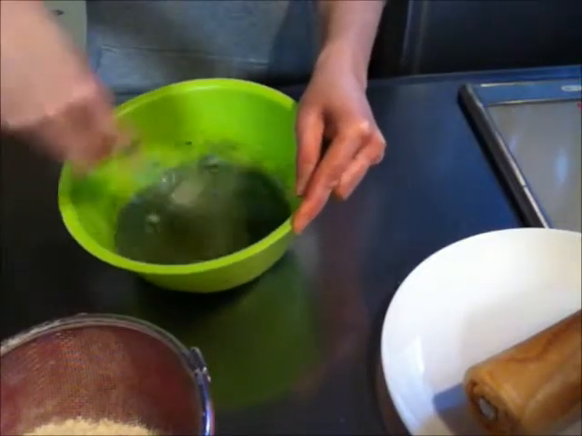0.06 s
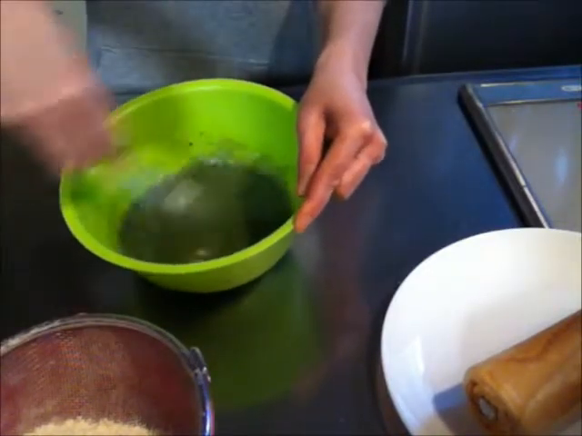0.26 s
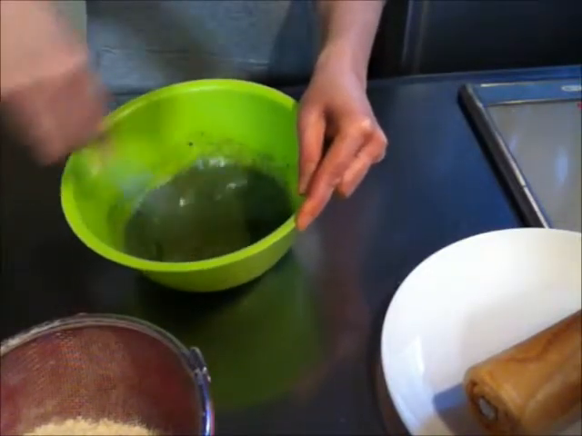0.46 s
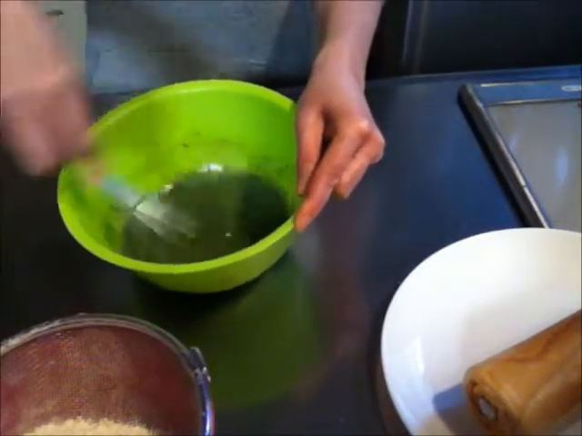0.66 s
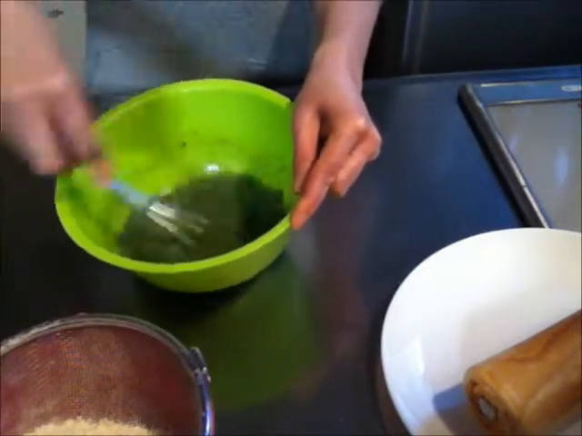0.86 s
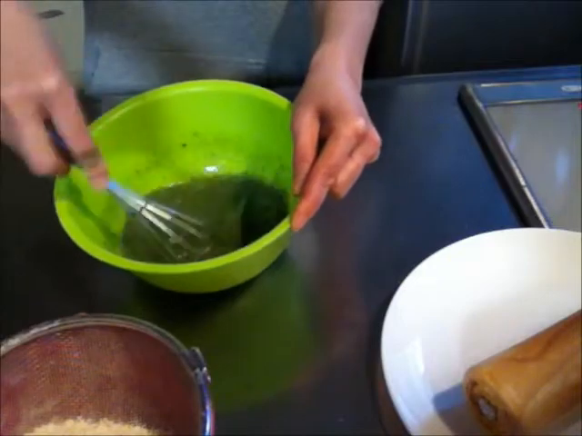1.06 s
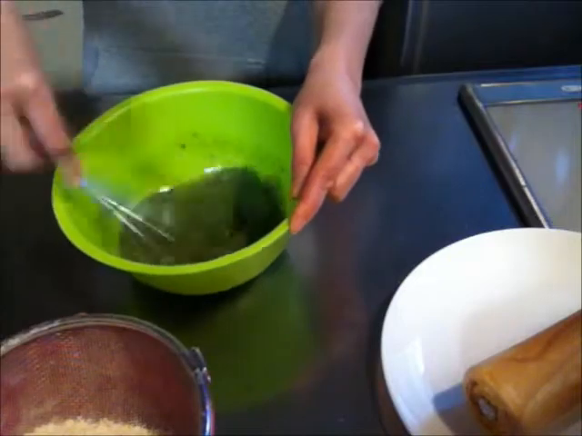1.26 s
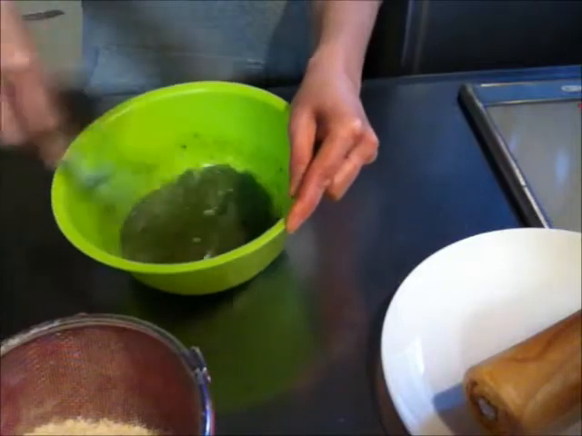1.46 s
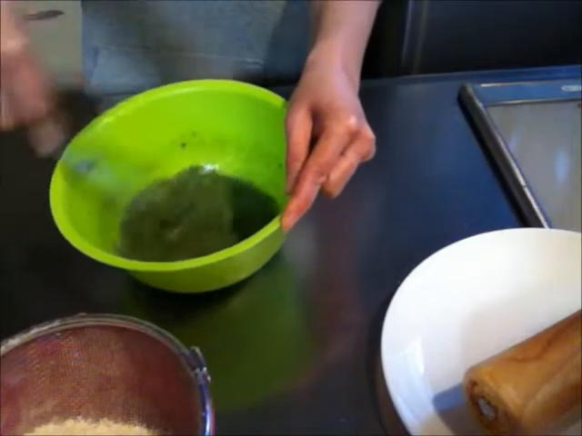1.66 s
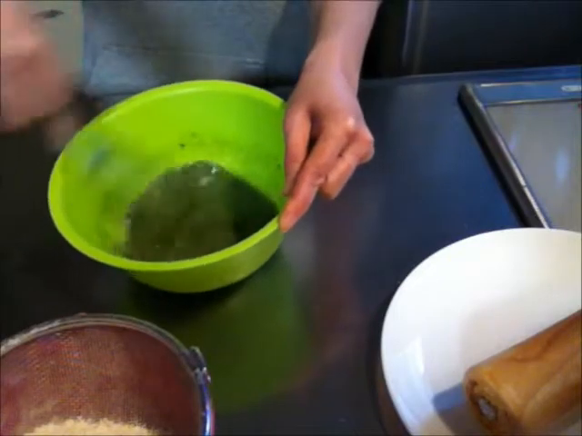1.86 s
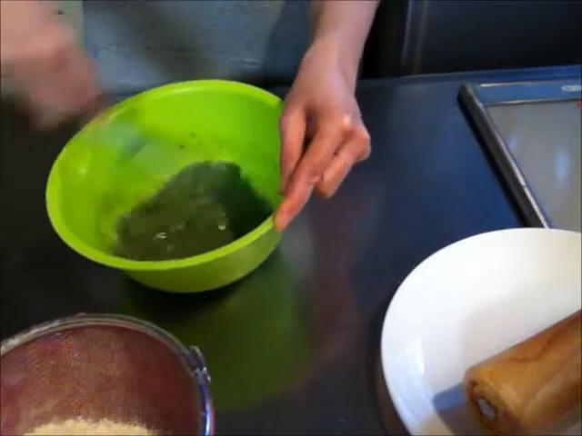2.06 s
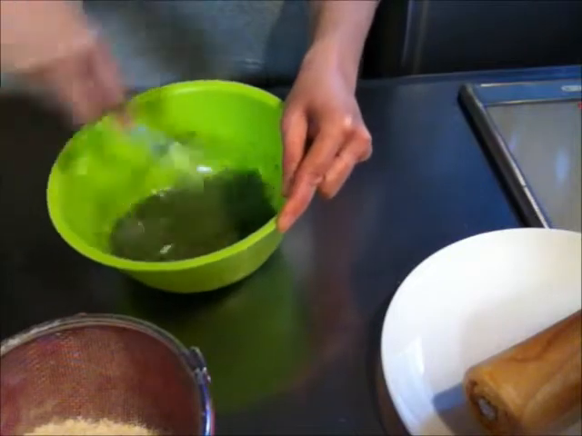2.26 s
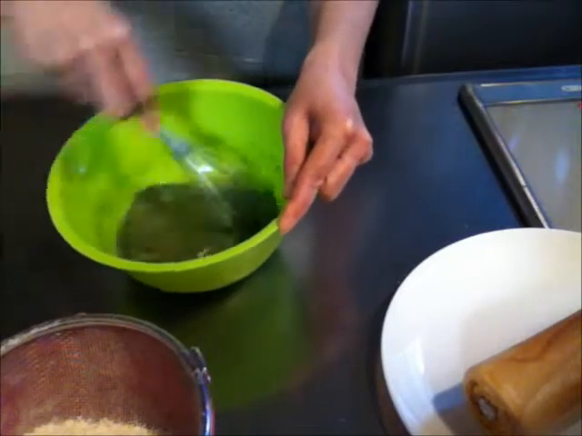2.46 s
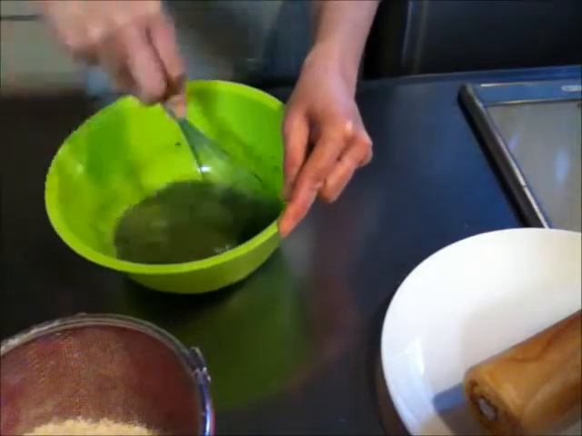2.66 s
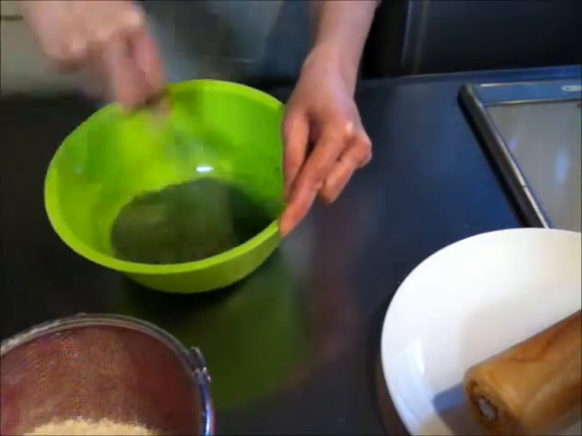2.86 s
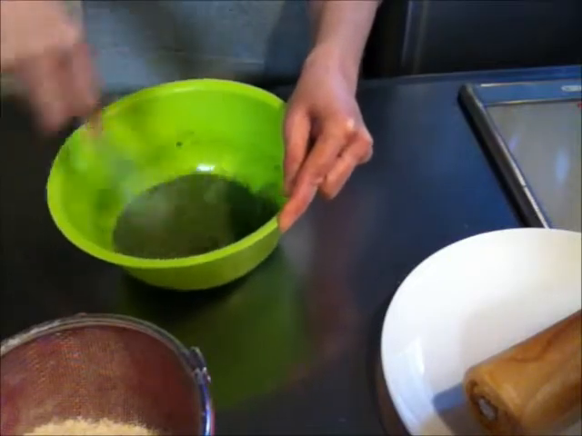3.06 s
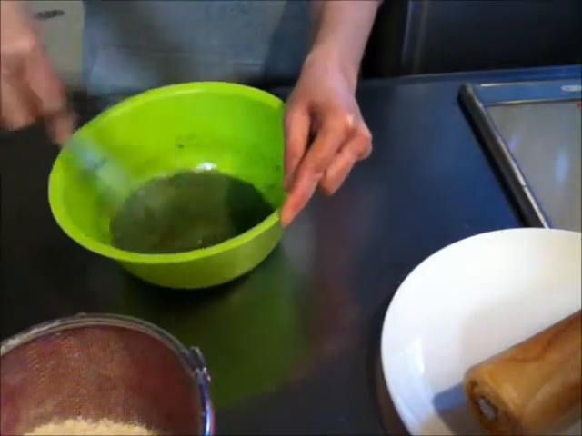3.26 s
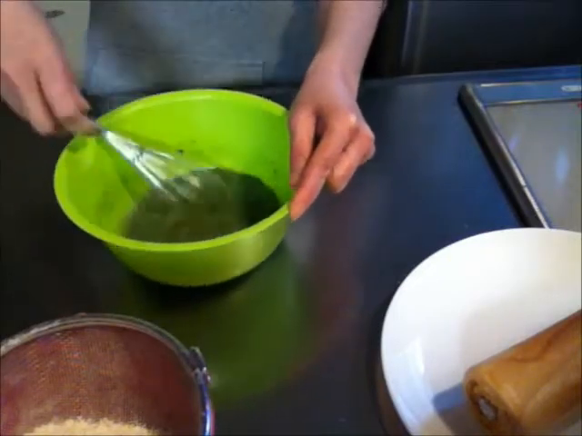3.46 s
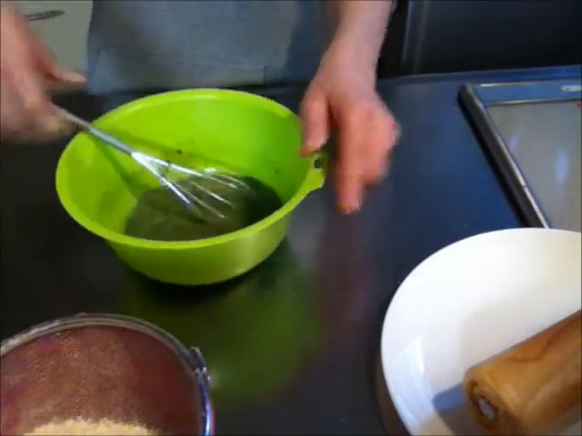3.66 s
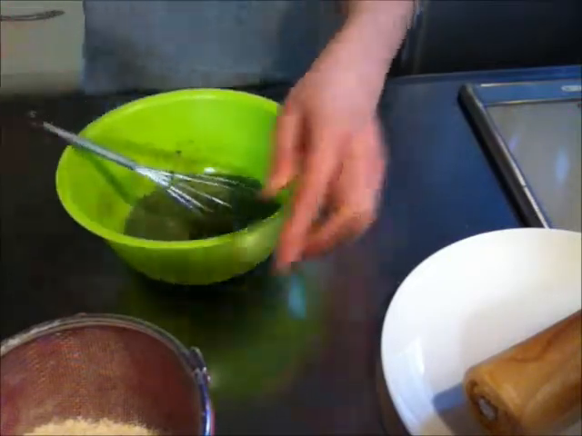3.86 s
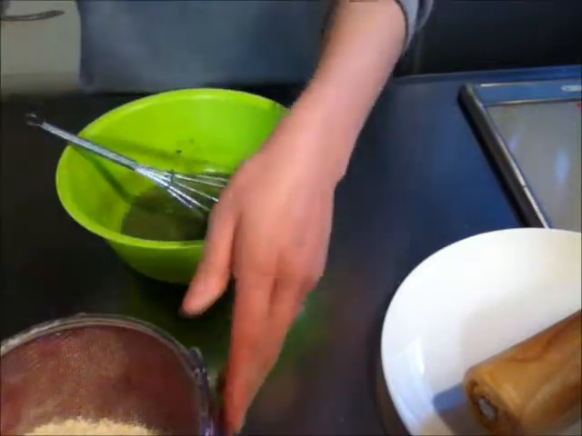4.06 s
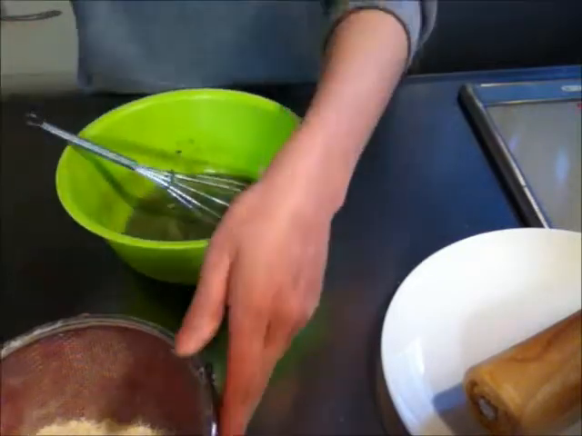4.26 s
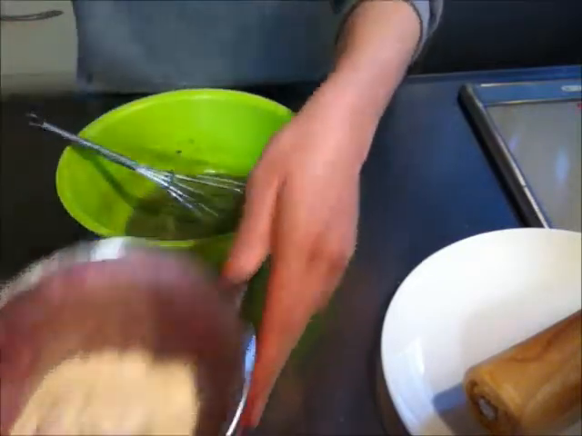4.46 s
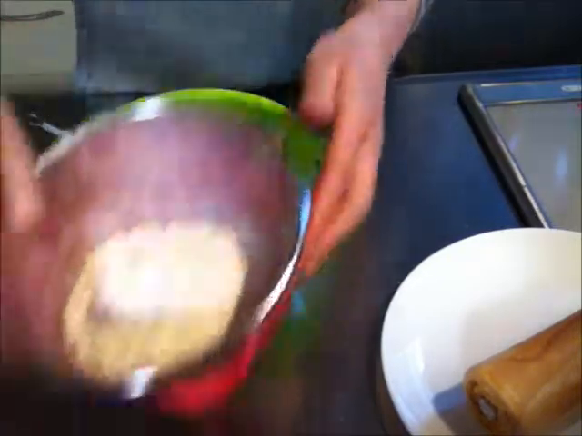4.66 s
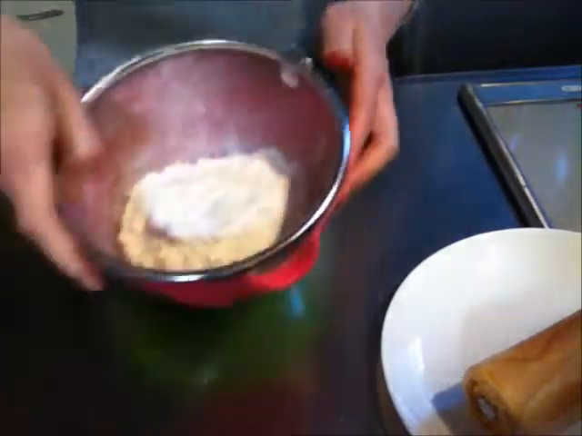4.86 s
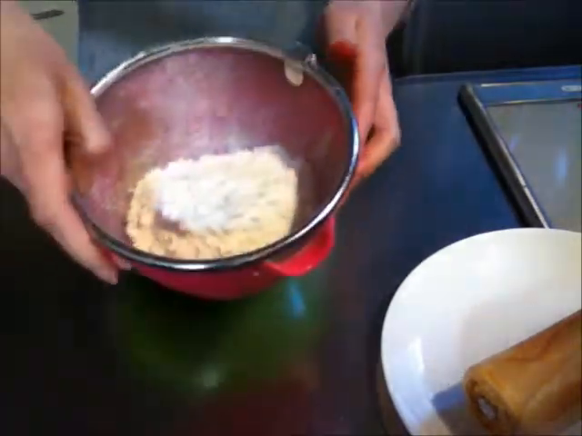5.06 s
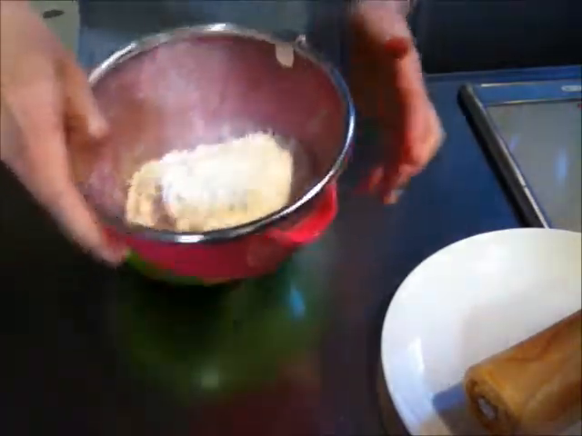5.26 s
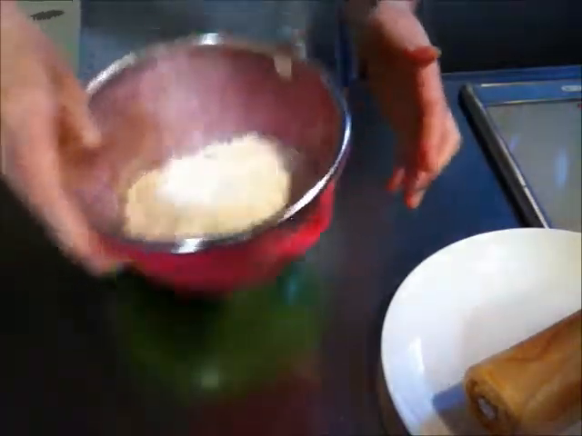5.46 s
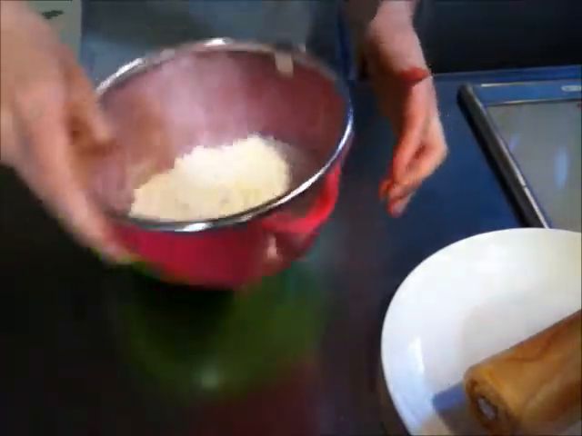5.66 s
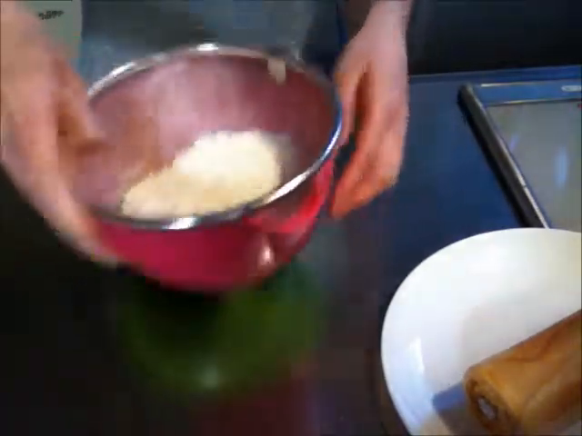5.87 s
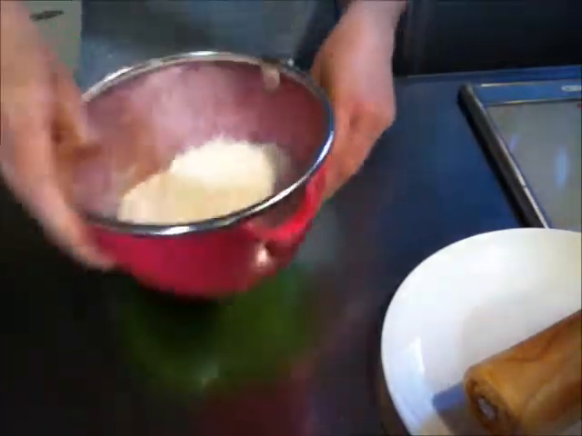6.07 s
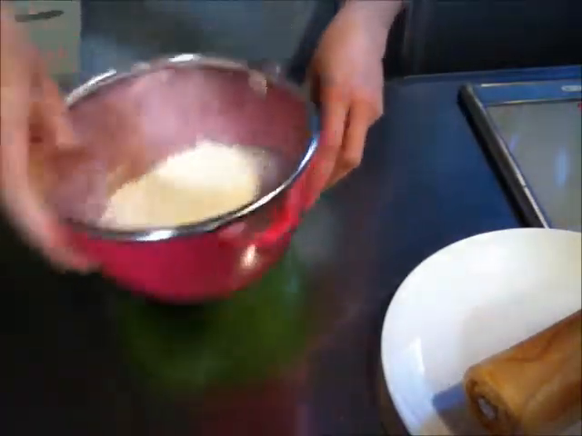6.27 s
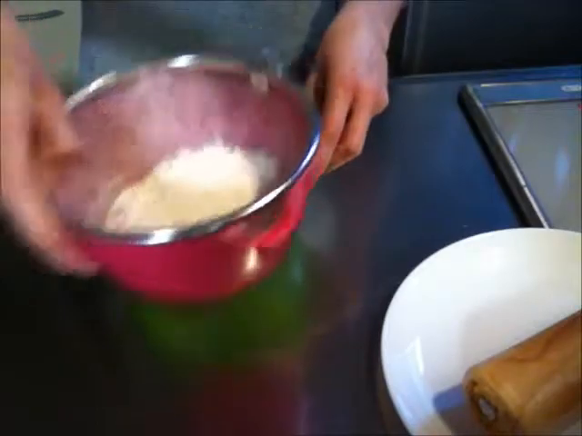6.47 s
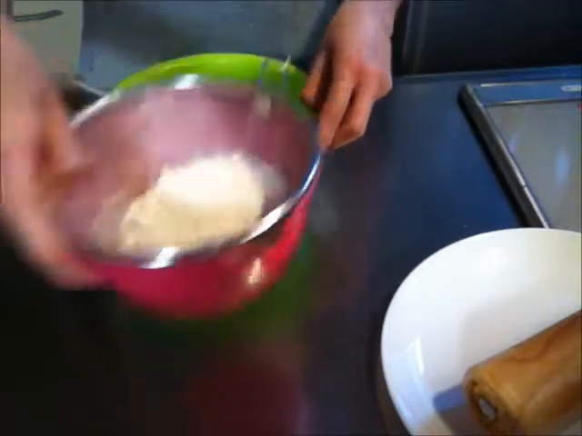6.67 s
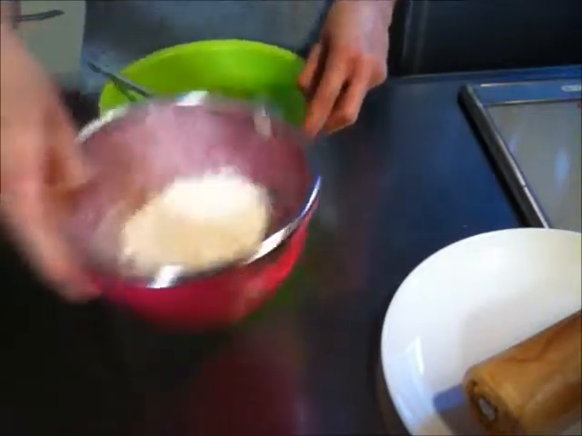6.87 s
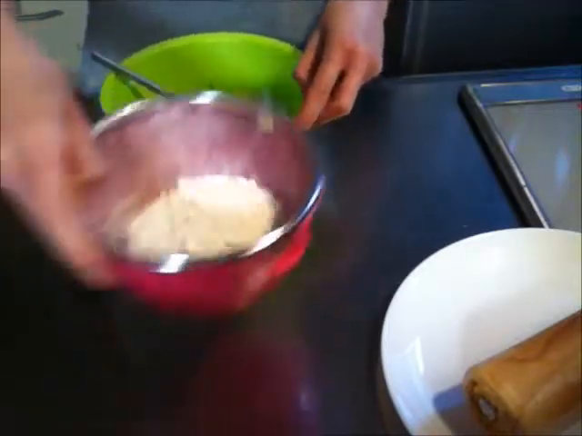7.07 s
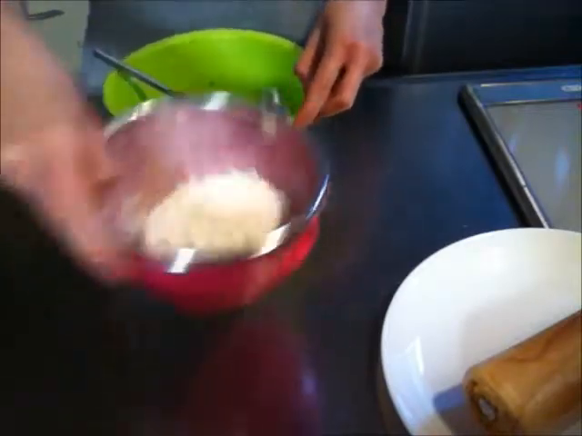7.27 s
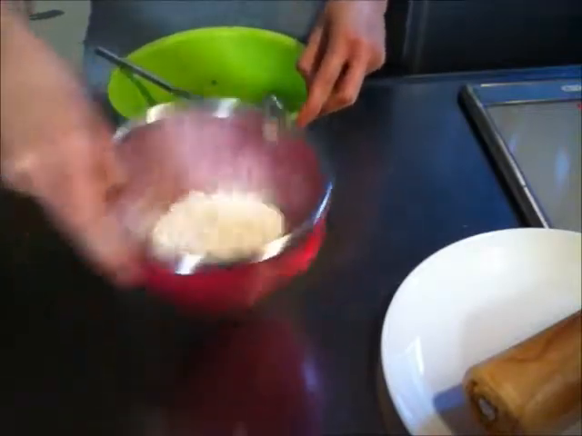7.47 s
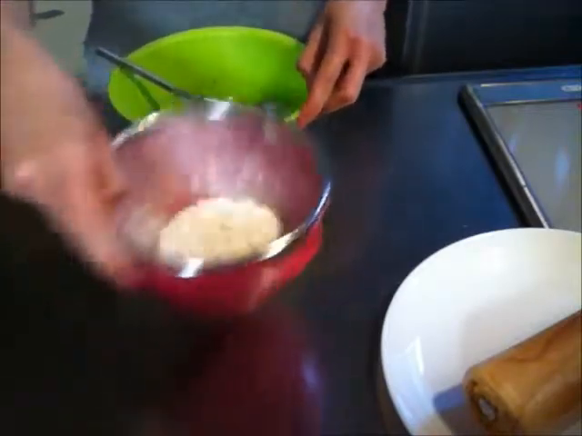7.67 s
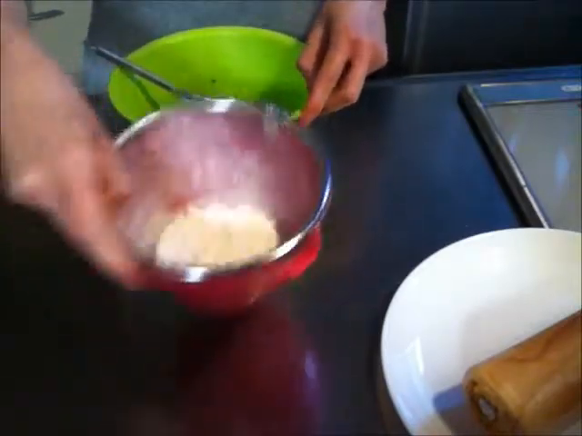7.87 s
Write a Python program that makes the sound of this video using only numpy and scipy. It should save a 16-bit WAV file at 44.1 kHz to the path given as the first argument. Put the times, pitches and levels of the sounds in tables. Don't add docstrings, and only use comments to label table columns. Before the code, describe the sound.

From 0 to about 3.5 seconds a wire whisk beats thin batter in a plastic bowl, close to the microphone: roughly eight or nine irregular scraping contacts a second, swelling and slipping off, with bright metallic snaps, wet crackle, hollow plastic notes and soft worktop thumps. The strokes ease near the end. At 3.56 the whisk is laid down with a dull knock and click; its handle rubs down the rim, buzzing low around 3.7 to 3.8 and stopping by 3.9. Faint handling and a small nudge come at 4.1 to 4.3, then near quiet. Soft palm pats begin at 5.2. From 5.4 to 7.9 a sieve in a bowl is shaken, its loose metal rim clacking about five times a second with fine chatter and shifting flour. At 6.65 the bowls collide dully; loud sharp clacks hit at 6.83 and 7.65. Light kitchen echo and steady hiss throughout.

```python
import sys
import numpy as np
from scipy import signal
from scipy.fft import rfft, irfft
from scipy.io import wavfile
from scipy.ndimage import uniform_filter1d

SR = 44100
rng = np.random.default_rng(int(sys.argv[2]) if len(sys.argv) > 2 else 0)


def nominal_scale(level):
    x = np.asarray(level, float) / 20
    return 10 ** x


def wav_record(signal):
    frames = np.transpose(np.atleast_2d(signal))
    bounded = np.clip(frames, -1, 1)
    quanta = np.round(bounded * 32767).astype(np.int16)
    wavfile.write(sys.argv[1], SR, quanta)


N = 349272

# start_s (the slip), scrape_db, hollow_db (re scrape), rise_ms (per 10 dB)
SWEEPS = [(0.009, -44.5, -1.5, 25), (0.077, -41.5, -20, 38), (0.176, -37.5, -5, 18),
          (0.287, -41.5, -11, 57), (0.495, -38.5, -11, 33), (0.603, -35.5, -7.5, 26), (0.712, -37, -23, 23),
          (0.828, -38, -27, 34), (0.869, -63, -20, 16), (1.033, -39, -25, 22), (1.249, -36, -19, 22),
          (1.292, -45.5, -3, 16), (1.355, -37.5, -4, 19), (1.465, -34, -4.5, 31), (1.555, -42.5, -19, 31),
          (1.67, -38, -12, 25), (1.876, -39, -15, 18), (1.957, -41.5, -13, 18), (2.101, -34.5, -19, 20),
          (2.221, -40, -2.5, 44), (2.33, -35, -7, 35), (2.432, -39, -4.5, 35), (2.531, -36, -13, 21),
          (2.967, -39, -12, 22), (3.082, -41, -4.5, 63), (3.198, -38.5, -6.5, 33), (3.281, -43, -8, 33),
          (3.426, -50, 2, 36)]
# start_s, scrape_db, hollow_db (re scrape), fall_ms (per 10 dB)
LANDINGS = [(0.226, -43.5, -2, 18), (0.382, -32.5, -4.5, 16.5), (0.545, -44, 1, 21), (0.646, -54, -13, 21),
            (0.902, -44.5, -31, 31), (0.927, -31.5, 0, 6.5), (1.075, -45, -6, 76), (1.093, -36.5, 3, 1),
            (1.143, -32, -0.5, 8), (1.206, -46, 6.5, 4), (1.405, -47.5, 0.5, 53), (1.571, -37, 1.5, 7),
            (1.624, -41.5, -5.5, 38), (1.727, -47, -18, 71), (1.771, -27.5, -7.5, 6), (1.835, -36, -3, 21),
            (1.982, -36.5, -11, 11.5), (2.046, -41.5, 1.5, 24), (2.077, -47, -9, 11),
            (2.177, -33, -5.5, 3.5), (2.377, -44.5, -2, 18), (2.584, -43.5, -0.5, 17),
            (2.619, -35, -4.5, 15), (2.72, -42, -22, 27), (2.745, -43, 0.5, 6), (2.838, -40, 1, 11),
            (3.03, -42, -1.5, 9), (3.219, -34, -5, 6), (3.36, -45.5, -4, 11), (3.377, -46, -20, 30)]
# start_s, drag_db, rumble_db (of the worktop)
DRAG = [
    (0, -45.5, -65),
    (1.4, -51, -66),
    (1.9, -50, -63.5),
    (2.5, -50, -64.5),
    (3.0, -50.5, -61.5),
    (3.4, -53, -72),
    (3.5, -74, -73),
    (3.55, -59, -66),
]
# start_s, peak_db
SNAPS = [(0.1685, -27), (0.2234, -15), (0.432, -11.5), (0.4928, -4.5), (0.7078, -1.5), (0.9248, -11),
         (1.143, 0), (1.692, -11.5), (1.7604, -4), (1.7699, -17), (1.8342, -29), (2.3775, -21),
         (2.8379, -22), (2.982, -7), (3.2156, -26)]
# start_s, peak_db, pitch_hz
FLECKS = [(0.1565, -22, 4850), (0.1685, -18, 2320), (0.2064, -24, 3830), (0.2234, -24.5, 4250),
          (0.3828, -19, 1856), (0.4534, -27, 4470), (0.4928, -21, 4220), (0.5427, -28, 2600),
          (0.6, -16, 3880), (0.6759, -29, 3860), (0.7078, -20, 2870), (0.7756, -27, 2660),
          (0.8205, -15.5, 3880), (0.8667, -27, 3780), (0.8994, -33, 2600), (0.9247, -18.5, 1543),
          (1.0254, -19, 3960), (1.0917, -27, 1484), (1.1428, -20, 1784), (1.2261, -29, 3940),
          (1.2387, -17, 4210), (1.3538, -30, 1486), (1.4025, -30, 1790), (1.5474, -28, 1590),
          (1.6222, -36, 2480), (1.6627, -20, 4670), (1.6901, -28, 1810), (1.7608, -22, 2980),
          (1.7691, -22, 2740), (1.8342, -21, 1565), (1.8761, -25, 1780), (1.9799, -24, 1630),
          (2.042, -25.5, 1820), (2.076, -27, 1814), (2.0943, -24.5, 1520), (2.176, -20, 1620),
          (2.2995, -22, 1830), (2.377, -28, 950), (2.4082, -26, 2960), (2.5082, -30, 2600),
          (2.5257, -21.5, 4070), (2.579, -25.5, 2400), (2.6189, -24, 2460), (2.7173, -27.5, 3830),
          (2.7427, -33, 1460), (2.821, -26, 2300), (2.8379, -34, 974), (2.9557, -28, 3950),
          (2.9804, -24, 3990), (3.028, -30, 926), (3.1542, -28.5, 1610), (3.194, -22, 4400),
          (3.216, -18.5, 4980), (3.273, -26, 3900), (3.3573, -25, 1490), (3.359, -28.5, 3810),
          (3.375, -27.5, 1550)]
# start_s, peak_db
HOLLOW_HITS = [(0.079, -49), (0.178, -30), (0.225, -44), (0.392, -27), (0.494, -33.5), (0.605, -30),
               (0.711, -31.5), (0.835, -42), (0.924, -39), (0.999, -40), (1.094, -33.5), (1.142, -34),
               (1.354, -33), (1.57, -43), (1.624, -34), (1.764, -47), (1.835, -37), (1.982, -35.5),
               (2.041, -46), (2.093, -42), (2.176, -36), (2.371, -34.5), (2.545, -36.5), (2.624, -31.5),
               (2.722, -36), (2.744, -28), (2.785, -42), (2.838, -44), (2.907, -39), (2.963, -29),
               (3.032, -36), (3.199, -44), (3.221, -36)]
# pitch_hz, width_hz, level_db
BOWL_BODY = [(612, 123, 1), (729, 54, 1.5), (974, 78, 3.5), (1098, 55, 5), (1549, 170, 6)]
BOWL_WALL = [(1810, 70, -1), (2400, 150, -1), (2700, 130, 1), (3050, 150, -3), (3750, 400, 1),
             (4350, 450, 0)]
WIRES = [(6400, 1200, 16.3), (8550, 1700, 10.4), (9300, 390, 5.2), (12300, 580, 5.6), (13400, 3100, 3.4)]

# start_s, metal_db, wall_db (re metal), fall_ms (per 10 dB)
CLACKS = [(5.412, -35.5, 0, 9.5), (5.602, -27.5, -3, 6.5), (5.781, -33, 2, 5.5), (5.964, -38, -18, 3),
          (5.988, -30.5, -5, 12), (6.176, -32.5, -0.9, 13.5), (6.357, -39, -10.5, 12),
          (6.385, -32, -1.2, 11.5), (6.434, -35.5, 0.5, 3), (6.556, -32.5, -11, 5), (6.6, -29.5, -3, 8),
          (6.654, -26, 1.8, 6.5), (6.757, -35, -32, 8), (6.829, -17, -22, 3), (6.969, -34.5, -17, 5.5),
          (7.18, -29, -28, 7), (7.387, -30, -19, 3), (7.427, -26.5, -16, 10), (7.654, -19, -15, 6),
          (7.813, -27, -30, 3.5), (7.822, -26.5, -13.5, 6.5)]
# start_s, metal_db, fall_ms (per 10 dB)
CHATTER = [(5.333, -53.5, 5), (5.455, -40, 4.5), (5.511, -42, 1.5), (5.551, -44, 7), (5.59, -40, 15),
           (5.615, -35, 5), (5.642, -49, 16), (5.759, -48, 6.5), (5.794, -37.5, 12), (5.884, -41, 12),
           (5.911, -45, 1.5), (6.028, -38, 3), (6.079, -43.5, 7), (6.157, -44, 16), (6.224, -40, 11),
           (6.285, -46.5, 6), (6.303, -41, 0), (6.456, -47, 19), (6.488, -40, 9), (6.513, -40, 5),
           (6.905, -45, 10), (6.962, -40, 3), (7.11, -47, 12), (7.17, -38.5, 1.5), (7.185, -34.5, 6),
           (7.317, -47, 20), (7.416, -50, 4), (7.549, -53, 39), (7.602, -44, 10), (7.799, -40, 4),
           (5.424, -56, 3), (5.494, -50, 2), (5.654, -48, 3), (5.694, -52, 5), (5.776, -37, 1),
           (5.833, -49, 6), (6.113, -50, 3), (6.607, -35, 7), (6.613, -38, 4), (6.648, -39, 1),
           (5.982, -45, -3), (6.547, -48, 6), (6.593, -43, 8), (6.977, -38.5, 4), (7.37, -50, 14),
           (7.669, -41, -2), (7.731, -50, 1), (7.834, -39, 0)]
# start_s, metal_db
PATS = [
    (5.216, -60.5),
    (5.304, -57.5),
    (5.393, -53.5),
    (5.469, -49.5),
    (5.515, -66),
    (5.885, -54),
    (6.078, -51.5),
    (7.528, -51.5),
]
# start_s, peak_db, pitch_hz
RIM_RINGS = [(5.4135, -24, 6050), (5.6001, -19, 7900), (5.783, -20, 12300), (5.9893, -21, 12500),
             (6.1755, -17.5, 6500), (6.383, -25, 6100), (6.553, -19.5, 12000), (6.5994, -23, 9900),
             (6.7545, -25.5, 6270), (6.8283, -9.5, 7850), (6.967, -25.5, 5940), (7.178, -13, 11500),
             (7.3865, -21, 12500), (7.4253, -15, 8250), (7.6011, -32.5, 6430), (7.6523, -7, 8600),
             (7.8118, -13, 11800), (7.8216, -21, 8450)]
# start_s, peak_db, pitch_hz
WALL_RINGS = [
    (5.4086, -28, 2550),
    (5.6007, -16.5, 3000),
    (5.781, -29, 3900),
    (5.9864, -21.5, 3060),
    (6.175, -18, 3120),
    (6.3831, -22, 4050),
    (6.598, -25, 3150),
    (6.8295, -20.5, 3800),
]
# start_s, flour_db, handling_db
GRASP = [
    (3.9, -77, -72),
    (4.2, -71, -77),
    (4.31, -62.5, -67),
    (4.4, -100, -82),
]
# start_s, flour_db, handling_db
SHAKE = [
    (5.2, -83, -78),
    (5.5, -70.5, -75),
    (6.1, -70.5, -74.5),
    (6.3, -64.5, -63.5),
    (6.8, -57, -57.5),
    (7.05, -65.5, -59),
    (7.15, -64.5, -67.5),
    (7.92, -83, -70),
]
# start_s, level_db
MURMUR = [
    (5.3, -53),
    (5.6, -47),
    (6.6, -52),
]
# pitch_hz, width_hz, level_db
SIEVE_RIM = [(6350, 300, 1), (7900, 200, -1), (8450, 110, 6), (9170, 120, 1), (9700, 120, -1),
             (10700, 180, 1), (11780, 130, 1), (12950, 400, -3)]
SIEVE_WALL = [(1940, 100, -3), (2510, 160, -1), (3050, 250, 0), (4080, 400, -1)]
SIEVE_BODY = [(690, 55, 6), (935, 90, -2), (1160, 90, -5), (1490, 80, -3)]

# start_s, level_db, bright_db
SLIDE = [
    (3.575, -34, -24),
    (3.64, -40.5, -11),
    (3.68, -42.5, -11.5),
    (3.72, -34.5, -15.5),
    (3.77, -34.5, -23),
    (3.8, -48, -14),
    (3.845, -44.5, -8),
    (3.88, -57, -26),
    (3.93, -76, -13),
]
# pitch_hz, level_db, start_s, end_s
HUM = [
    (163.6, -51, 3.58, 3.67),
    (408, -49, 3.68, 3.88),
    (700, -55, 3.61, 3.8),
    (760, -63, 3.8, 3.88),
    (924, -59, 3.6, 3.87),
    (1150, -54, 3.66, 3.8),
]
# pitch_hz, width_hz, level_db
RIM = [(153, 43, -2), (246, 27, -7), (405, 32, 2), (727, 33, 5.5), (936, 19, 2.5), (1180, 97, -0.5),
       (1440, 100, 8), (1790, 21, 2), (2300, 57, -1), (2426, 35, 4), (2810, 140, 0), (3060, 46, 3)]
# start_s, peak_db, pitch_hz, t60_s
LAID_DOWN = [
    (3.557, -34, 178, 0.095),
    (3.557, -38, 776, 0.088),
    (3.573, -36.5, 1120, 0.044),
    (3.574, -41, 934, .06),
    (6.83, -41.5, 640, 0.056),
    (6.983, -40.5, 430, 0.075),
]
# start_s, peak_db, crack_db (re peak), ring_s
KNOCKS = [
    (3.56, -26.5, -3, 0.024),
    (3.576, -32, 18.5, 0.022),
    (3.596, -53, -14, 0.027),
    (4.102, -57, 17, 0.017),
    (4.248, -48, -2, 0.11),
    (4.270, -43, -11, 0.02),
    (6.653, -11, -13, 0.057),
    (6.692, -42, -17, 0.081),
]
# pitch_hz, level_db
KNOCK_MODES = [(130, -10.5), (153, -11), (200, -8.5), (232, -10.5), (300, -6), (356, -4.5), (410, -4),
               (480, -2.5), (565, 0), (650, 3), (715, 1.5), (800, -8), (930, -3), (1090, -9)]

# start_s, level_db
BUMPS = [(0.177, -44), (0.489, -56), (0.708, -37), (0.925, -46), (1.441, -39.5), (1.684, -44), (1.79, -38),
         (1.908, -37), (2.84, -42), (3.252, -47.5), (3.343, -43.5), (3.56, -33.5), (4.248, -40.5)]
# pitch_hz, width_hz, level_db
COUNTER = [(145, 63, -2.5), (191, 42.4, 2), (236, 24, -6), (363, 33, -1.5)]
# pitch_hz, t60_s
KITCHEN = [(150, 0.38), (600, 0.27), (2500, 0.37), (8000, 0.23), (16000, 0.21)]
# pitch_hz, level_db (per Hz)
HUSH = [(30, -17), (80, -12), (105, -6), (150, -11), (400, 1), (1500, -7), (2400, -9.5), (16000, -12.5)]

BODY_HZ, WALL_HZ, METAL_HZ, TOP_HZ = 540, 1700, 5600, 18000
FIRM_DB, SLIP_MS, SLIP_MS_PER_DB, LAND_MS = -36, 11.9, 1.3, 3.2
SWEEP_HISS_DB, LAND_HISS_DB, HISS_PER_DB, TIRING_DB_PER_S = -1, -2.5, 0.1, 1.5
BOWL_RING_DB = 3.5
FLECK_DB, FLECK_CYCLES, BITE_MS = -10.5, 96, 3.03
HOLLOW_HZ, HOLLOW_T60_S, HOLLOW_DB = 768, 0.078, -3
POPS_PER_S, POP_CYCLES, POP_DB, POP_HZ = 350, 13.6, -11.5, (690, 5670)
GLIDE_HZ, GLIDE_RISE, GLIDE_S, GLIDE_WIDTH_HZ, GLIDE_DB = (2600, 4000), .2, 0.041, 220, -6
CLACK_MS, SHARP_RISE, CLACK_BODY_DB, BODY_FOLLOWS = 2.4, 0.33, -7, 0.62
CHATTER_RISE, CHATTER_WALL_DB, CHATTER_BODY_DB = 0.36, -11, -16
PAT_WALL_DB, PAT_BODY_DB, PAT_RISE_MS, PAT_FALL_MS = -4.5, -3.5, 2.6, 13
PAT_NOTE_DB, NOTE_HZ = -7.5, (655, 745)
SIEVE_RING_DB, SIEVE_SHIFT_DB = -7, 3
RATTLE_DB, RATTLE_MS, RATTLE_WALL_DB, RATTLE_DELAY_S = -18, 17, -11.5, 0.0086
RATTLE_RING_DB = 6
RING_DB, RING_CYCLES, RIM_BITE_MS = -6, 81, 0.8
WALL_RING_CYCLES = 18
JUDDER_S, JUDDER_END_S, JUDDER_FADE_S = 3.692, 3.785, 0.013
JUDDER_HZ, JUDDER_WOBBLE, JUDDER_ARC, JUDDER_DB = 134.2, 0.017, .1, -27.5
GRIP_LUMPS_DB, HUSH_DB, MIC_HZ = 4, -65, 118


def rms_one(x):
    return x / np.sqrt(np.mean(x ** 2) + 1e-20)


def in_time(rows):
    s, *columns = np.transpose(rows)
    return [np.interp(np.arange(N) / SR, s, c, left=-300, right=-300) for c in columns]


def at_hz(points, hz):
    pitch_hz, value = np.transpose(points)
    return np.interp(np.log(hz + 1), np.log(pitch_hz), value)


def drift(rate):
    r = np.exp(-80 * np.pi * rate / SR)
    noise = rng.standard_normal(N // 40 + 2002)
    slow = signal.lfilter([1], [1, -2 * r, r * r], noise)[2000:]
    return np.interp(np.arange(N) / 40, np.arange(len(slow)), rms_one(slow))


def band(x, low_hz, high_hz):
    edges = [low_hz, min(high_hz, .45 * SR)]
    return signal.sosfilt(signal.butter(2, edges, "band", fs=SR, output="sos"), x)


def grit(per_s, uneven_db):
    sizes = nominal_scale(uneven_db * np.minimum(rng.exponential(1, N), 5)) * rng.choice([-1, 1], N)
    return rms_one(sizes * (rng.random(N) < per_s / SR))


def body(force, modes, low_hz, high_hz, ring_db, shift_db=6):
    driven_at = np.flatnonzero(np.abs(force) > 1e-9)
    first, last = driven_at[0], driven_at[-1] + 1
    both = np.concatenate([force[first:last], np.zeros(6000), [1.], np.zeros(4000)]) + 1e-18

    def wander(depth_db, rate):
        return np.append(nominal_scale(depth_db * np.tanh(drift(rate)[first:last])), np.ones(10001))

    edges, out = np.geomspace(low_hz, high_hz, 4), 0
    for k in range(3):
        out = out + (-1) ** k * band(both * wander(4, 25), edges[k], edges[k + 1])
    for hz, width, level_db in modes:
        r = np.exp(-np.pi * width / SR)
        polarity = -1 if edges[1] < hz < edges[2] else 1
        gain = polarity * nominal_scale(level_db + ring_db) * (1 - r * r) / 2
        poles = [1, -2 * r * np.cos(2 * np.pi * hz / SR), r * r]
        out += gain * signal.lfilter([1, 0, -1], poles, both * wander(shift_db, 16))
    click_gain = np.sqrt(np.sum(out[-4001:] ** 2))
    return np.concatenate([np.zeros(first), out[:-4001], np.zeros(N)])[:N] / click_gain


def pressure(contacts, order):
    out, around = np.zeros((3, N)), np.arange(-5000, 5000)
    t_ms = around * 1000 / SR
    for s, level_db, first_db, second_db, rise_ms, fall_ms in contacts:
        swell = np.abs(t_ms / max(rise_ms, .3)) ** order
        shape_db = -10 * np.where(t_ms < 0, swell, t_ms / max(fall_ms, .3))
        at = round(s * SR) + around
        inside = (at >= 0) & (at < N)
        power = nominal_scale(2 * (level_db + shape_db[inside]))
        out[:, at[inside]] += power * nominal_scale([[0], [2 * first_db], [2 * second_db]])
    return np.sqrt(out)


def ping(hz, t60, bite):
    t = np.arange(3000) / SR
    rung = np.convolve(np.sin(2 * np.pi * hz * t) * nominal_scale(-60 * t / t60), bite)[:3000]
    return rung / np.abs(rung).max()


def strokes():
    def hiss(s, db):
        return HISS_PER_DB * (db - FIRM_DB) - TIRING_DB_PER_S * s

    sweeps = [(s, db, hollow, SWEEP_HISS_DB + hiss(s, db), rise, SLIP_MS + SLIP_MS_PER_DB * (FIRM_DB - db))
              for s, db, hollow, rise in SWEEPS]
    landings = [(s, db, hollow, LAND_HISS_DB + hiss(s, db), LAND_MS, fall)
                for s, db, hollow, fall in LANDINGS]
    return sweeps + landings


def whisk():
    wall, hollow, hiss = pressure(strokes(), order=1)
    drag = nominal_scale(in_time(DRAG)[0] + 3.24 * drift(34))
    flutter = rms_one(np.gradient(uniform_filter1d(np.log(drag + 1e-9) * (drag > 1e-6), 200)))
    force = grit(per_s=7000, uneven_db=2.5) * nominal_scale(1.54 * np.tanh(flutter))
    snaps = np.zeros(N)
    snap_shape = nominal_scale([-23.0, -14.0, -23.5, -17]) * [1, -1, 1, 1]
    for s, level_db in SNAPS:
        snaps[round(s * SR) + np.array([0, 23, 61, 94])] = nominal_scale(level_db) * snap_shape
    on_body = force[::-1] * np.hypot(hollow, nominal_scale(-5.5) * drag) + nominal_scale(-2.5) * snaps
    on_wall = force * np.hypot(wall, nominal_scale(-9.5) * drag) + snaps
    on_wires = force * np.hypot(hiss, nominal_scale(-14.5) * drag) + nominal_scale(3.5) * snaps
    return (body(on_body, BOWL_BODY, BODY_HZ, WALL_HZ, ring_db=8.0)
            - body(on_wall, BOWL_WALL, WALL_HZ, METAL_HZ, ring_db=BOWL_RING_DB)
            + body(on_wires, WIRES, METAL_HZ, TOP_HZ, ring_db=-3.5))


def glides():
    ends = np.array(SWEEPS)[:, 0]
    starts_hz = rng.uniform(*GLIDE_HZ, len(ends))
    knots = np.ravel(np.transpose([ends - GLIDE_S, ends + .005]))
    knots_hz = np.ravel(np.transpose([starts_hz, starts_hz * (1 + GLIDE_RISE)]))
    hz = np.interp(np.arange(N) / SR, knots, knots_hz)
    rough = rms_one(band(grit(per_s=1500, uneven_db=3.0), 19, GLIDE_WIDTH_HZ))
    press = pressure(strokes()[:len(ends)], order=1)[0]
    return nominal_scale(GLIDE_DB) * press * rough * np.sin(2 * np.pi * np.cumsum(hz) / SR)


def pops():
    force = grit(POPS_PER_S, uneven_db=2.5) * pressure(strokes(), order=1)[0] * nominal_scale(POP_DB)
    dealt, out = rng.integers(0, 18, N), 0
    for k, hz in enumerate(np.geomspace(*POP_HZ, 18)):
        r, w = nominal_scale(-60 * hz / POP_CYCLES / SR), 2 * np.pi * hz / SR
        poles = [1, -2 * r * np.cos(w), r * r]
        burst = signal.lfilter([0, np.sqrt(2 - 2 * r * r)], poles, force * (dealt == k) + 1e-18)
        out = out + burst * np.sin(w)
    return out


def flecks():
    out, ms = np.zeros(N), np.arange(400) * 1000 / SR
    rows = [(s, db + FLECK_DB, hz, FLECK_CYCLES / hz, BITE_MS) for s, db, hz in FLECKS]
    rows += [(s, db + HOLLOW_DB, HOLLOW_HZ, HOLLOW_T60_S, BITE_MS) for s, db in HOLLOW_HITS]
    rows += [(s, db + RING_DB, hz, RING_CYCLES / hz, RIM_BITE_MS) for s, db, hz in RIM_RINGS]
    rows += [(s, db + RING_DB, hz, WALL_RING_CYCLES / hz, BITE_MS) for s, db, hz in WALL_RINGS]
    rows += [(*row, BITE_MS) for row in LAID_DOWN]
    for s, db, hz, t60, bite_ms in rows:
        bite = rng.standard_normal(400) ** 3 * nominal_scale(-10 * ms / bite_ms)
        out[round(s * SR):][:3000] += nominal_scale(db) * ping(hz, t60, bite)
    return out


def pats():
    return [(s, db, PAT_WALL_DB, PAT_BODY_DB, PAT_RISE_MS, PAT_FALL_MS) for s, db in PATS]


def taps():
    clacks = [(s, db, wall, CLACK_BODY_DB + BODY_FOLLOWS * wall, min(CLACK_MS, SHARP_RISE * fall), fall)
              for s, db, wall, fall in CLACKS]
    chatter = [(s, db, CHATTER_WALL_DB, CHATTER_BODY_DB, CHATTER_RISE * ms, ms) for s, db, ms in CHATTER]
    return clacks + chatter + pats()


def sieve():
    metal, wall, hollow = pressure(taps(), order=1.5)
    flour_level = nominal_scale(in_time(GRASP + SHAKE)[0] + 3 * np.tanh(drift(25)))
    flour = flour_level * grit(per_s=5000, uneven_db=4.0)
    force = grit(per_s=7000, uneven_db=3.2)
    nudges = nominal_scale(PAT_NOTE_DB) * np.isin(np.arange(N), [round(s * SR) for s, _ in PATS])
    murmur = force[::-1] * nominal_scale(in_time(MURMUR)[0] + 8 * np.tanh(drift(20)))
    ring = dict(ring_db=SIEVE_RING_DB, shift_db=SIEVE_SHIFT_DB)
    tap_thud = nominal_scale(10.5) * band(force * hollow, 298, 660)
    hollow_note = band(force * nominal_scale(-27) * hollow + nudges + murmur, *NOTE_HZ)
    return (body(force * metal + flour, SIEVE_RIM, METAL_HZ, TOP_HZ, **ring)
            - body(force * wall + nominal_scale(-4.5) * flour, SIEVE_WALL, WALL_HZ, METAL_HZ, **ring)
            + body(force * hollow + nominal_scale(-5.0) * flour, SIEVE_BODY, BODY_HZ, WALL_HZ, **ring)
            + tap_thud + hollow_note)


def rattle():
    rows = [(s + RATTLE_DELAY_S, db + RATTLE_DB, RATTLE_WALL_DB, 0, 4.0, RATTLE_MS) for s, db, *_ in CLACKS]
    metal, wall, _ = pressure(rows, order=1)
    force = grit(per_s=1500, uneven_db=5.0) * nominal_scale(1.8 * np.tanh(drift(90)))
    return (body(force * metal, SIEVE_RIM, METAL_HZ, TOP_HZ, RATTLE_RING_DB, SIEVE_SHIFT_DB)
            - body(force * wall, SIEVE_WALL, WALL_HZ + 800, METAL_HZ, ring_db=14.0))


def slide():
    level_db, bright_db = in_time(SLIDE)
    force, wobble = grit(per_s=2500, uneven_db=3.5), drift(33)
    force = force * nominal_scale(level_db + 2.1 * wobble)
    t = np.arange(N) / SR
    arc = np.sin(np.pi * np.clip((t - JUDDER_S) / (JUDDER_END_S + .04 - JUDDER_S), 0, 1))
    slip_hz = JUDDER_HZ * (1 + JUDDER_WOBBLE * wobble + JUDDER_ARC * (arc - .7))
    slips = np.diff(np.floor(np.cumsum(slip_hz) / SR), prepend=0)
    caught = np.clip(np.minimum(t - JUDDER_S, JUDDER_END_S - t) / JUDDER_FADE_S, 0, 1)
    slips = slips * nominal_scale(JUDDER_DB) * caught
    low_rub = body(nominal_scale(-7) * force * (1 - .7 * caught), RIM[:6], 130, 1300, ring_db=15)
    high_rub = body(force * nominal_scale(bright_db) + slips, RIM[6:], 1300, 3800, ring_db=8)
    rub = band(band(low_rub + high_rub, 96, 6100), 60, 6300)
    return rub + nominal_scale(24.5) * band(slips, 92, 290)


def hum():
    t, out = np.arange(N) / SR, 0
    for hz, db, start, end in HUM:
        fade = np.clip(np.minimum(t - start, end - t) / 0.044, 0, 1)
        level = fade * nominal_scale(db + 5.8 * np.tanh(drift(21)))
        out = out + level * np.sin(2 * np.pi * np.cumsum(hz * (1 + 0.0116 * drift(10.5))) / SR)
    return out


def knocks():
    out, t = np.zeros(N + 9000), np.arange(9000) / SR
    signs = (-1) ** np.maximum(np.arange(len(KNOCK_MODES)), 4)
    for s, level_db, crack_db, ring_s in KNOCKS:
        scatter, noise = rng.normal(0, 1.5, len(KNOCK_MODES)), rng.standard_normal(9000)
        rings = 0
        for (hz, db), v, sign in zip(KNOCK_MODES, scatter, signs):
            decay = nominal_scale(db + v - 60 * t / ring_s * (hz / 300) ** 0.78)
            rings = rings + decay * np.sin(2 * np.pi * hz * t) * sign
        crack = band(band(noise, 820, 4000), 450, 4400) * nominal_scale(crack_db - 5.5 - 60 * t / 0.017)
        settling = band(noise[::-1], 360, 1600) * nominal_scale(-7.0 - 60 * t / (2.8 * ring_s))
        settling = settling * (1 - np.exp(-t / 0.0035))
        out[round(s * SR):][:9000] += nominal_scale(level_db) * (rings / np.abs(rings).max() + crack + settling)
    return out[:N]


def counter():
    leaning = pressure(strokes(), order=1)[1]
    beating = nominal_scale(in_time(DRAG)[1]) * (1 + nominal_scale(48.0) * leaning)
    handling = nominal_scale(in_time(GRASP + SHAKE)[-1] + GRIP_LUMPS_DB * np.tanh(drift(26)))
    force = rng.standard_normal(N) * (beating + handling)
    for s, level_db in BUMPS:
        force[round(s * SR)] += nominal_scale(level_db + 19.0)
    return body(force, COUNTER, 110, 420, ring_db=13)


def kitchen(x):
    t, tails = np.arange(SR // 2) / SR, 0
    for hz in 125 * 2. ** np.arange(8):
        octave = band(rng.standard_normal((3, len(t))), hz / 2 ** .5, hz * 2 ** .5)
        tails = tails + octave * nominal_scale(-60 * t / at_hz(KITCHEN, hz))
    tails = tails * np.clip((t - .001) / .005, 0, 1)
    shares = np.cos(np.pi * (np.arange(N) / SR / .57 + np.arange(3)[:, None] / 3)) ** 2
    return signal.fftconvolve(x * shares, tails, axes=1).sum(0)[:N]


def hush():
    hz = np.arange(N // 2 + 1) * SR / N
    coloured = rfft(rng.standard_normal(N)) * nominal_scale(at_hz(HUSH, hz))
    return nominal_scale(HUSH_DB) * rms_one(irfft(coloured, N))


def scene():
    near = whisk() + sieve() + slide() + counter() + knocks() + pops() + rattle()
    rings = flecks() + hum()
    wet = kitchen(near + nominal_scale(-8) * rings)
    near = near + rings
    bass_cut = signal.butter(6, MIC_HZ, "high", fs=SR, output="sos")
    heard = signal.sosfilt(bass_cut, near + nominal_scale(-39 + 2.4 * np.tanh(drift(60))) * wet)
    shaking = uniform_filter1d(np.abs(near), 1500)
    shudder = nominal_scale(-8.5) * shaking * band(rng.standard_normal(N), 18, 130)
    return (heard + shudder + hush() + glides())[None]


def roll_off(x):
    return signal.sosfilt(signal.butter(12, 16990, fs=SR, output="sos"), x)


def record(dry):
    rounded = np.tanh(dry)
    shelved = signal.sosfilt(signal.cheby2(10, 24, 16150, fs=SR, output="sos"), rounded)
    mix = signal.sosfilt(signal.cheby2(8, 50, 17250, fs=SR, output="sos"), shelved)
    return roll_off(mix)


dry = scene()
out = record(dry)
wav_record(out)
```